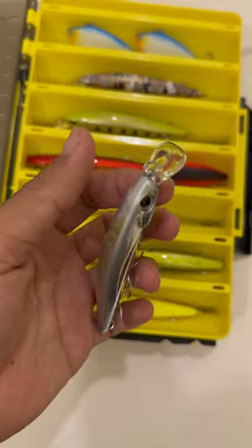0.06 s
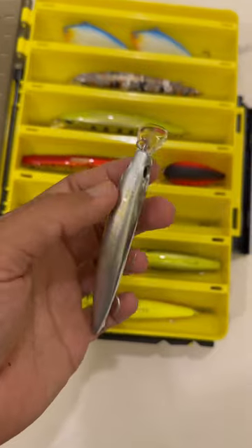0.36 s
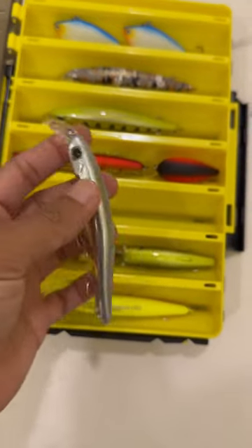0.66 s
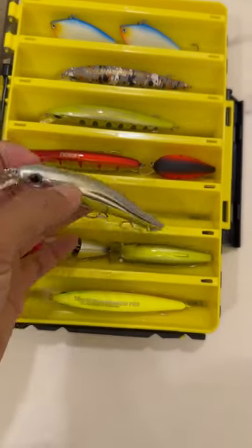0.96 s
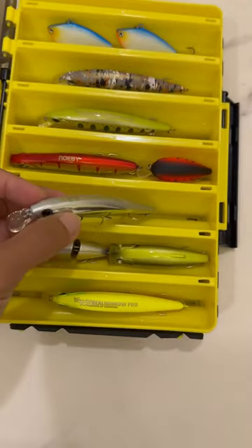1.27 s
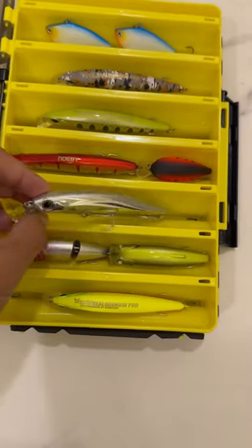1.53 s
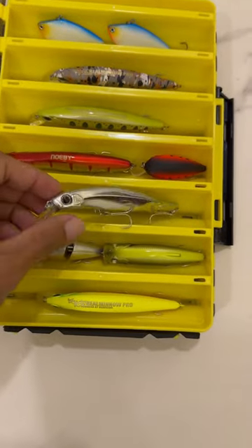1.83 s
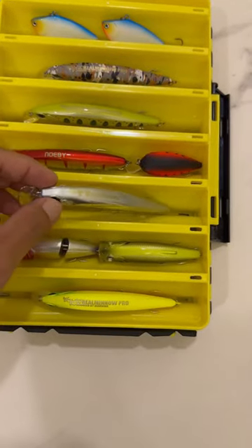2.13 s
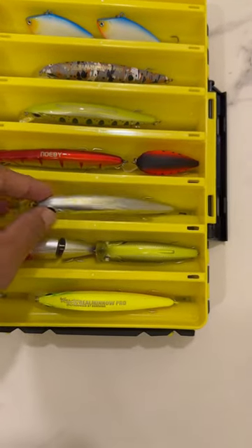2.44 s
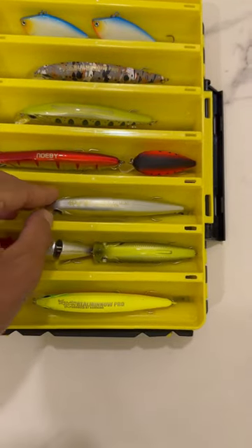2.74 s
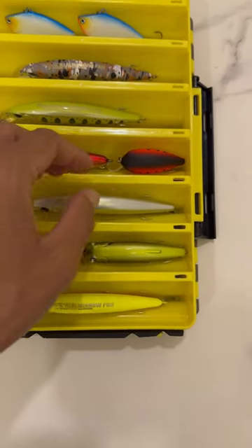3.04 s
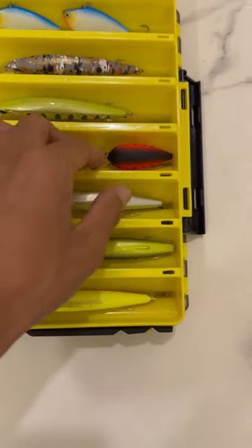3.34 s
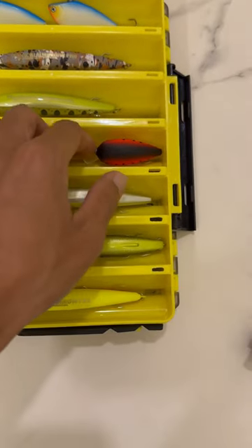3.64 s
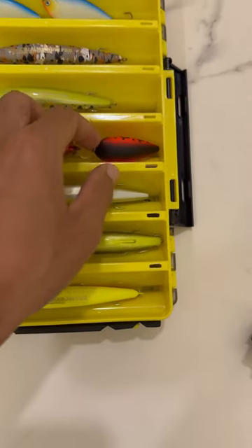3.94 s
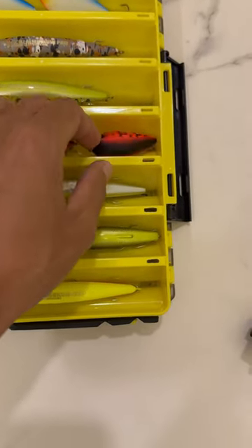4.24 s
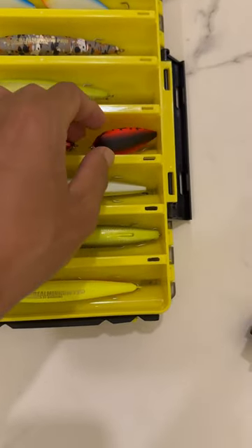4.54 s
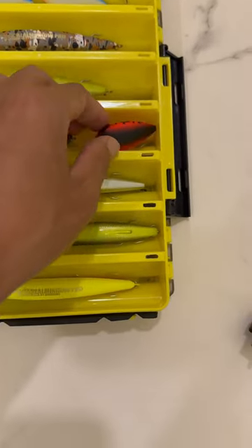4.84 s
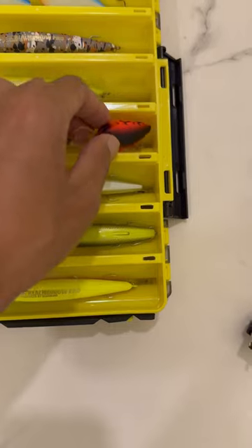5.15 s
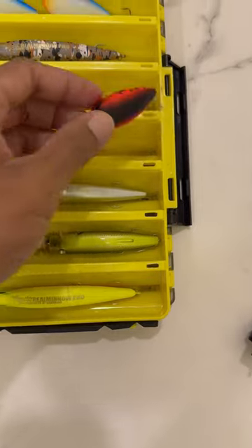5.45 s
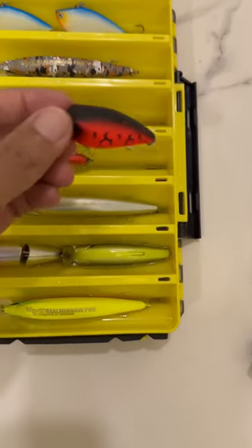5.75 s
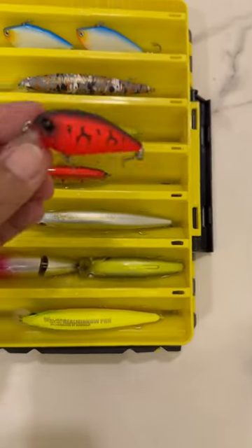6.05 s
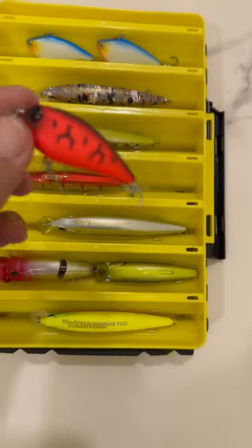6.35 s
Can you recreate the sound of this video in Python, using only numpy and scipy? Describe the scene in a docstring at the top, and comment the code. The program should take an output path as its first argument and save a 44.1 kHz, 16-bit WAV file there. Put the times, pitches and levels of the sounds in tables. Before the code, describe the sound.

For the first second there is only a faint low room hum and barely audible hook ticks. From about 1.1 seconds a hard plastic lure goes into a thin plastic tackle box tray: light, hollow knocks and clicks, short scrapes and small metal hook clinks. They come in uneven clusters around 1.2, 1.4, 1.8 and 2.1 seconds, with another sharp knock at 2.8. After a short lull, softer taps and rubbing start at 3.3 as a second lure is worked loose. It clatters at 3.9, taps and scrapes around 4.4, and gives the loudest clatter at 4.9 with a dull, low bump of the box. Hooks click lightly until about 5.4 seconds, then only faint ticks and jingles continue to the end at 6.6. Everything is close, in a small, hard room with a short echo.

```python
"""Lures in a tackle box

A plastic minnow lure drops into its slot in an open box; a crankbait is picked out of another.
Bodies knock, scrape and rub on thin tray walls; steel hooks and split rings tick and jingle.
Shoves make the box boom. It stands on a stone counter in a small, hard room with a low hum,
a phone held just above it."""
import sys
import numpy as np
from scipy import signal
from scipy.fft import rfft, irfft, next_fast_len
from scipy.io import wavfile

SR = 44100
rng = np.random.default_rng(int(sys.argv[2]) if len(sys.argv) > 2 else 0)


def generate_wav(sig):
    """Save sig (samples, or channels by samples) to the path in sys.argv[1] as 16-bit PCM at SR."""
    pcm = np.round(np.clip(np.atleast_2d(sig).T, -1, 1) * 32767).astype(np.int16)
    wavfile.write(sys.argv[1], SR, pcm)


N = 290619

# room hum spectrum (frequency [Hz], relative density [dB])
HUM_SPECTRUM = [(20, -25), (35, -14.5), (52, -4), (72, -9.5), (100, -2), (150, -6.5), (200, 1.5),
                (300, -10.5), (600, -18.5), (1000, -30), (2500, -43.5), (7000, -53)]
# room hum envelope (time [s], level [dB])
HUM_ENVELOPE = [(0, -67.5), (.45, -65), (.8, -67), (1, -67.5), (1.15, -60), (1.5, -62), (2, -70),
                (2.85, -75), (3.02, -64.5), (3.24, -74.5), (3.4, -70.5), (4.5, -65.5), (5.1, -63),
                (5.6, -66.5), (5.9, -75), (6.3, -80.5), (6.59, -74)]
# hiss spectrum (frequency [Hz], relative density [dB])
HISS_SPECTRUM = [(300, 4.5), (1000, 4.5), (2500, 2.5), (4000, 0.5), (5000, -2.5), (7000, -1.5), (9500, -5),
                 (11000, -23.5), (16000, -26.5)]
# hooks trembling on their rings (start [s], end [s], pitch [Hz], relative level [dB])
JINGLES = [(0.316, .524, 6500, -82), (1.399, 1.563, 10300, -56), (5.548, 5.858, 4500, -73.5),
           (5.876, 5.939, 14000, -62.5), (5.95, 6.176, 14100, -83.5), (6.362, 6.597, 8570, -75)]
# plastic on finger or wall (start [s], end [s], resonance [Hz], width [Hz], level [dB])
RUBS = [(0.344, 0.447, 8560, 1200, -72), (0.39, 0.538, 2800, 1300, -82), (0.48, 0.508, 9000, 2500, -64.5),
        (1.673, 1.794, 2350, 250, -69), (2.008, 2.045, 6600, 1210, -68), (5.634, 5.679, 2600, 1404, -67),
        (5.817, 5.869, 2293, 1402, -67.5), (5.875, 6.167, 8700, 1500, -76.5),
        (6.38, 6.586, 8570, 2000, -81.5)]
# hook and ring contacts (time [s], pitch [Hz], level [dB])
TICKS = [(.3605, 6400, -68.5), (.4525, 2930, -69.5), (0.4976, 14000, -57.5), (1.2132, 7950, -41.5),
         (1.2467, 6530, -39), (1.37, 7000, -56), (1.433, 14000, -42.5), (1.485, 14000, -50),
         (1.509, 13000, -53), (1.7785, 14000, -44), (2.16, 13800, -43.5), (2.3517, 3150, -43.5),
         (2.628, 4400, -54.5), (3.4115, 4850, -49.5), (3.466, 1490, -48.5), (3.8262, 4500, -45.5),
         (3.8517, 7800, -43), (3.8924, 14000, -43), (3.9277, 14000, -43), (4.158, 7000, -55),
         (4.3029, 10200, -49.5), (4.315, 13300, -53), (4.4325, 4170, -37), (4.44, 4950, -38),
         (4.578, 3450, -46), (4.7146, 6070, -50.5), (4.8095, 6760, -43), (4.9014, 7000, -39.5),
         (5.1031, 4540, -46), (5.1632, 1500, -53), (5.2, 4000, -51.5), (5.2515, 3000, -50.5),
         (5.315, 4000, -40.5), (5.3366, 5030, -42), (5.4012, 6100, -36), (5.57, 9500, -63.5),
         (5.6435, 7000, -49), (5.7128, 5000, -62), (5.8717, 4470, -57), (5.911, 12000, -59),
         (6.059, 11000, -64), (6.264, 3660, -63.5), (6.4381, 4000, -57), (6.4852, 4200, -59.5),
         (6.5334, 3460, -59.5), (6.5722, 7370, -54)]
# lure on tray (time [s], wall pitch [Hz], level [dB], softness as treble loss [dB/oct])
KNOCKS = [(1.081, 700, -34, 7), (1.2147, 716, -30.5, 13.5), (1.2192, 1340, -33, 1.5),
          (1.2471, 1660, -24, 13.5), (1.2833, 940, -41, 15), (1.3899, 660, -27, 8), (1.4211, 680, -27.5, 4),
          (1.432, 493, -42, 3), (1.5597, 1260, -45, 6), (1.5984, 654, -44.5, 7.5), (1.7712, 880, -42, 3),
          (1.7795, 1940, -21, 7.5), (1.783, 433, -20, 7), (2.0666, 805, -41, 4), (2.0723, 990, -25.5, 3.5),
          (2.0831, 606, -24.5, 8), (2.106, 1020, -26.5, 7), (2.1463, 674, -31.5, 3.5), (2.16, 2000, -24, 8),
          (2.1639, 636, -36.5, 0), (2.3289, 737, -31.5, 6), (2.394, 970, -31, 7.5), (2.531, 800, -30.5, 12),
          (2.538, 714, -41, 4.5), (2.5552, 564, -35.5, 7), (2.776, 630, -37.5, 7),
          (2.7854, 1793, -19.5, 10), (2.7974, 1850, -34, 5), (2.8, 1620, -26.5, 11.5),
          (3.2729, 1160, -45, 9.5), (3.3331, 900, -47, 7), (3.374, 836, -44, 10), (3.3898, 1000, -41.5, 11),
          (3.446, 1170, -38, 4.5), (3.5044, 1010, -36, 4), (3.6631, 1185, -46, 11), (3.717, 1080, -40.5, 9),
          (3.814, 1460, -48, 12), (3.8376, 465, -37, 4.5), (3.885, 460, -32.5, 7.5),
          (3.8936, 530, -25, 1.5), (3.897, 470, -21.5, 6), (3.903, 1440, -25, 18),
          (3.9285, 636, -30.5, 1.5), (3.932, 500, -21.5, 5.5), (4.0662, 2000, -46, 16),
          (4.142, 565, -36.5, 3), (4.168, 495, -40, 4), (4.2082, 448, -46, 6), (4.2921, 513, -45.5, 9.5),
          (4.3982, 550, -33.5, 5), (4.4173, 1140, -32.5, 4.5), (4.452, 445, -33.5, 5.5),
          (4.4889, 1210, -30.5, 6.5), (4.5015, 1480, -39.5, 2), (4.6428, 2030, -46.5, 14),
          (4.722, 550, -36.5, 5), (4.776, 650, -39, 7.5), (4.7894, 1570, -41, 7.5), (4.8714, 900, -46.5, 4),
          (4.8774, 520, -34, 5), (4.9014, 484, -21.5, 8), (4.9105, 1010, -19.5, 2.5), (4.917, 1670, -18, 7),
          (4.921, 436, -25.5, 1.5), (4.9445, 1590, -24, 15), (4.948, 462, -29.5, 2), (4.966, 447, -31, 6),
          (5.4016, 1220, -45, -1), (5.8197, 1800, -55, 6)]
# shoves on the box (time [s], level [dB])
SHOVES = [(1.084, -45), (1.222, -43), (1.393, -46.5), (1.781, -56), (2.785, -45.5), (3.898, -43.5),
          (4.168, -53.5), (4.398, -58.5), (4.912, -36.5)]
# lure along tray (start [s], end [s], wall pitch [Hz], relative level [dB], softness [dB/oct])
SLIDES = [(1.266, 1.317, 520, -49, 5.5), (1.664, 1.804, 520, -58.5, 4), (1.989, 2.074, 650, -54, 5.5),
          (2.086, 2.15, 520, -50.5, 3), (2.498, 2.55, 750, -53.5, 5), (2.541, 2.641, 520, -46.5, 6.5),
          (3.335, 3.486, 700, -50, 6), (3.663, 3.791, 850, -55.5, 4.5), (3.799, 3.894, 850, -55.5, 2),
          (3.892, 3.961, 1600, -38, 4.5), (4.137, 4.38, 520, -58, 3), (4.396, 4.523, 650, -46.5, 4),
          (4.519, 4.606, 650, -47, 6.5), (4.75, 4.907, 520, -43, 5), (4.89, 4.98, 1300, -35.5, 2.5),
          (5.057, 5.253, 1200, -58, 3.5), (5.246, 5.347, 850, -50.5, 2)]
# body, clack, snap, tick and sparkle bands (low edge [Hz], high edge [Hz])
BANDS = [(345, 760), (760, 2100), (2100, 5200), (5200, 10300), (11000, 16500)]
# tray modes (frequency [Hz], relative level [dB], t60 [s])
TRAY_MODES = [(433.7, 11.5, 0.027), (430, 6, 0.11), (520, 1, 0.062), (594, 1.5, 0.24), (883.4, -4.5, 0.027),
              (1020.4, 5.5, 0.08), (1152, 4, 0.046), (1440, 3, 0.061), (1556, -2, 0.13), (1850, 0.5, 0.019),
              (2440, -1.5, 0.094), (2860, -5.5, 0.069), (3407, -8, .035)]
# steel hook modes (frequency [Hz], relative level [dB], t60 [s])
HOOK_MODES = [(5350, -4, 0.11), (5800, -2.5, .05), (6450, -8, .04), (7460, 1, 0.035), (7250, -2.5, 0.12),
              (8340, -6, 0.065), (9900, -5.5, .04)]
# room decay (frequency [Hz], t60 [s])
ROOM_DECAY = [(100, 0.9), (400, 0.54), (1000, 0.5), (2000, 0.5), (3200, 0.32), (5000, 0.34), (7000, 0.33),
              (10000, 0.25), (16000, 0.16)]
# echo spectrum (frequency [Hz], relative level [dB])
ROOM_SPECTRUM = [(100, -14.5), (250, -19), (420, -14.5), (800, -12), (1450, -15.5), (2000, -15.5),
                 (2700, -8.5), (3700, -14.5), (4800, -11.5), (7000, -15.5), (10000, -10), (16000, -17)]
# stereo width (frequency [Hz], side gain [dB])
WIDTH = [(100, -17), (400, -15), (700, -6.5), (1300, -13), (2200, -10.5), (3000, 3.5), (4000, -12.5),
         (4900, -3.5), (5700, -17), (7000, -3.5), (9000, -3), (16000, 2)]
# treble colour, with a hollow near 12 kHz (frequency [Hz], mid gain [dB], side gain [dB])
TREBLE_COLOUR = [(3704, -2.5, -4), (4720, -10.5, -2), (5700, 1.5, -8), (7000, 1.5, -2), (8170, -5, -9),
                 (9470, -2.5, -2.5), (10600, -12, -4.5), (12300, -20, -0.5), (14500, -11.5, -8),
                 (15500, -7.5, 5.5)]

FILTER_CACHE = {}


def undb(db):
    return 10 ** (np.asarray(db) / 20)


def unit_rms(x):
    return x / np.sqrt(np.mean(x ** 2) + 1e-20)


def decay(t, t60_s):
    return np.exp(-np.log(1000) * t / max(t60_s, 1e-4))


def lookup(points, hz, column=1):
    """Interpolate a table over log frequency."""
    table = np.array(points, float)
    return np.interp(np.log(np.maximum(hz, 1)), np.log(table[:, 0]), table[:, column])


def colour(x, points, column=1):
    """Filter by a table of gains in dB."""
    size = next_fast_len(2 * len(x))
    gain = undb(lookup(points, np.fft.rfftfreq(size, 1 / SR), column))
    return irfft(rfft(x, size) * gain, size)[:len(x)]


def band(x, edges_hz, order=3):
    key = (*edges_hz, order)
    if key not in FILTER_CACHE:
        FILTER_CACHE[key] = signal.butter(order, edges_hz, "bandpass", fs=SR, output="sos")
    return signal.sosfilt(FILTER_CACHE[key], x)


def add(track, time_s, sound):
    start = int(time_s * SR)
    part = sound[:, :N - start]
    track[:, start:start + part.shape[1]] += part


def hum(waver_db=0.6):
    """Low, slowly wavering room noise."""
    t = np.arange(N) / SR
    steps_s = np.linspace(0, t[-1], 50)
    waver = np.interp(t, steps_s, rng.standard_normal(len(steps_s)))
    gain = undb(np.interp(t, *np.transpose(HUM_ENVELOPE)) + waver_db * waver)
    mid, side = (unit_rms(colour(rng.standard_normal(N), HUM_SPECTRUM)) for _ in range(2))
    return gain * np.array([mid, colour(side, [(100, -15.5), (500, 2.5), (2500, 1.5)])])


def hiss(level_db=-86):
    """Faint, steady noise, uncorrelated left and right."""
    noise = rng.standard_normal((2, N))
    return undb(level_db) * np.array([unit_rms(colour(x, HISS_SPECTRUM)) for x in noise])


def contact_levels(hz, db, bass_db_oct, treble_db_oct):
    """Band levels in dB, falling away on both sides of the contact's pitch."""
    octaves = np.log2(np.sqrt(np.prod(BANDS, axis=1)) / hz)
    return db + bass_db_oct * np.minimum(octaves, 0) - treble_db_oct * np.maximum(octaves, 0)


def steel(hz, db):
    """Band levels of steel: hardness is constant, so part size alone sets the colour."""
    return contact_levels(hz, db, bass_db_oct=6, treble_db_oct=8)


def ring(modes, t, detune, spread_db=4):
    """Damped modes; mix and tuning vary with each contact point and hook."""
    draws = rng.uniform(-0.94, 1, (len(modes), 3))
    out = np.zeros(len(t))
    for (hz, db, t60_s), (mix, tuning, phase) in zip(modes, draws):
        tone = np.sin(2 * np.pi * (hz * (1 + detune * tuning) * t + phase))
        out += undb(db + spread_db * mix) * tone * decay(t, t60_s)
    return out


def blow(bands, levels_db, t60s_s, rise_s, tone_hz=1000, tone_db=-99, t60_cycles=6, ring_db=-35):
    """One contact, mid/side: a crack of dense modes, the struck part's tone, tray and hook ringing."""
    t = np.arange(SR // 8) / SR
    onset = SR // 125  # first 8 ms set the level
    push = 1 - np.exp(-t / rise_s)  # plastic yields before it springs back
    out = np.zeros((2, len(t)))
    for channel in out:
        phase = rng.uniform(0, 2 * np.pi)
        tone = undb(tone_db) * np.sin(2 * np.pi * tone_hz * t + phase) * decay(t, t60_cycles / tone_hz)
        ringing = ring(TRAY_MODES, t, detune=.012) + ring(HOOK_MODES, t, detune=.04)
        for (low_hz, high_hz), db, t60_s in zip(bands, levels_db, t60s_s):
            wide_hz = (low_hz * .6, min(high_hz * 1.7, SR * .45))
            crack = unit_rms(band(rng.standard_normal(len(t)), wide_hz, order=1)) * decay(t, t60_s)
            part = band(push * (crack + tone + undb(ring_db) * ringing), (low_hz, high_hz))
            channel += undb(db) * part / np.sqrt(np.mean(part[:onset] ** 2))
    return out


def pressure(size, waver_db):
    """A hand stroke sets in, wavers and lets go."""
    steps = np.arange(0, N, SR // 70)
    swell = signal.windows.tukey(size, .5) ** .7
    waver = np.interp(np.arange(size), steps, rng.standard_normal(len(steps)))
    return swell * undb(waver_db * waver)


def drag(length_s, levels_db, catches_per_s, spread_db, points=4):
    """Tiny, uneven catches at a few contact points, each ringing tray and hooks."""
    size = max(int(length_s * SR), SR // 100)
    trigger, direction, grip = rng.random((size, 3)).T
    strength = undb(spread_db * np.minimum(-np.log(grip), 3))
    catches = (trigger < catches_per_s / SR) * np.sign(direction - .5) * strength
    catches *= pressure(size, waver_db=5.5)
    point = rng.integers(points, size=size)
    sound = 0
    for k in range(points):
        response = blow(BANDS, levels_db, t60s_s=(.015, .0057, .039, .008, .008), rise_s=.0006)
        sound += signal.fftconvolve((catches * (point == k))[None], response, axes=1)
    return sound * np.linalg.norm(undb(levels_db)) / np.sqrt(np.mean(sound[0, :size] ** 2) + 1e-20)


def jingles(gain_db=-1):
    """Loose hooks tremble in runs of tiny ticks."""
    out = np.zeros((2, N))
    for start_s, end_s, hz, db in JINGLES:
        add(out, start_s, drag(end_s - start_s, steel(hz, db + gain_db), catches_per_s=400, spread_db=3))
    return out


def rubs():
    """Fine friction keeps one lure resonance whispering."""
    out = np.zeros((2, N))
    for start_s, end_s, hz, width_hz, db in RUBS:
        size = max(int((end_s - start_s) * SR), SR // 100)
        friction = band(rng.standard_normal((2, size)), (hz - width_hz / 2, hz + width_hz / 2), order=2)
        add(out, start_s, undb(db) * unit_rms(friction * pressure(size, waver_db=3.5)))
    return out


def bounce(sound, rebound_db):
    """A light part touches twice more within milliseconds."""
    out = sound.copy()
    lags_s = np.cumsum(rng.uniform(.0012, .0045, size=2))
    for count, lag_s in enumerate(lags_s, 1):
        lag = int(lag_s * SR)
        out[:, lag:] += undb(rebound_db * count) * sound[:, :-lag]
    return out


def ticks(max_t60_s=0.033, knee_hz=3000):
    """Hooks and rings graze lure or wall; above the knee, smaller hooks die out sooner."""
    out = np.zeros((2, N))
    for time_s, hz, db in TICKS:
        clink_t60_s = max_t60_s * min(knee_hz / hz, 1) ** 2
        tick = blow(BANDS[1:], steel(hz, db)[1:], t60s_s=(.0056, .018, .0093, .012), rise_s=.0018,
                    tone_hz=hz, tone_db=-5, t60_cycles=clink_t60_s * hz)
        add(out, time_s, bounce(tick, rebound_db=-13.5))
    return out


def plastic(hz, db, softness_db_oct, sparkle_loss_db=6, sparkle_cap_db=-48):
    """Band levels of plastic: soft contacts lose treble; under hard blows the sparkle stops rising, as jarred
    hooks can only ring so loud."""
    levels_db = contact_levels(hz, db, bass_db_oct=4.5, treble_db_oct=softness_db_oct)
    levels_db[-1] = min(levels_db[-1] - sparkle_loss_db, sparkle_cap_db)
    return levels_db


def knocks():
    """Hollow lures hit the tray; low wall modes outlast high ones."""
    out = np.zeros((2, N))
    for time_s, wall_hz, db, softness_db_oct in KNOCKS:
        levels_db = plastic(wall_hz, db, softness_db_oct)
        knock = blow(BANDS, levels_db, t60s_s=(.018, .0086, .014, .0098, .008), rise_s=.001,
                     tone_hz=wall_hz, tone_db=2)
        add(out, time_s, bounce(knock, rebound_db=-11))
    return out


def booms(hz=97, t60_s=0.37, rise_s=0.012, thud_db=-2):
    """Shoves rock the whole box: one low mode plus a thud, mid only."""
    out = np.zeros((2, N))
    t = np.arange(SR // 2) / SR
    mode = np.sin(2 * np.pi * hz * t) * decay(t, t60_s)
    for time_s, db in SHOVES:
        thud = unit_rms(band(rng.standard_normal(len(t)), (60, 260))) * decay(t, t60_s=0.19)
        swing = (mode + undb(thud_db) * thud) * (1 - np.exp(-t / rise_s))
        add(out[:1], time_s, undb(db) * swing[None])
    return out


def slides(gain_db=-1):
    """Lure bodies scrape along the walls in dense catches."""
    out = np.zeros((2, N))
    for start_s, end_s, wall_hz, db, softness_db_oct in SLIDES:
        levels_db = plastic(wall_hz, db + gain_db, softness_db_oct)
        add(out, start_s, drag(end_s - start_s, levels_db, catches_per_s=1800, spread_db=2))
    return out


def room(x, length_s=.7, rise_s=.0023, gain_db=-3):
    """Diffuse echoes off hard walls, mid/side; treble dies first, bass stays near the centre."""
    t = np.arange(int(length_s * SR)) / SR
    build_up = 1 - np.exp(-(t / rise_s) ** 2)
    edges_hz = np.geomspace(60, 17000, 29)
    response = np.zeros((2, len(t)))
    for low_hz, high_hz in zip(edges_hz, edges_hz[1:]):
        hz = np.sqrt(low_hz * high_hz)
        tail = band(rng.standard_normal((2, len(t))), (low_hz, high_hz))
        tail *= decay(t, lookup(ROOM_DECAY, hz)) * build_up
        energy = np.sum(tail ** 2, axis=1, keepdims=True)
        tail *= np.sqrt(2 * (high_hz - low_hz) / SR / energy)  # unity gain in band
        tail[1] *= undb(3.5 + 0.66 * lookup(WIDTH, hz))
        response += undb(lookup(ROOM_SPECTRUM, hz)) * tail
    return undb(gain_db) * signal.fftconvolve(x[None], response, axes=1)[:, :N]


def scene():
    """Mix box, room and noise in mid/side; return left/right."""
    contacts = knocks() + ticks() + slides() + jingles()
    clatter = band(contacts, (320, 20000), order=6)  # small walls radiate no bass
    mid, side = clatter + rubs() + booms()
    echoes = room(mid) + room(side)  # each radiated direction takes its own path
    mid, side = np.array([mid, colour(side, WIDTH)]) + echoes
    coloured = np.array([colour(mid, TREBLE_COLOUR, column=1), colour(side, TREBLE_COLOUR, column=2)])
    mid, side = coloured + hum() + hiss()
    return np.array([mid + side, mid - side])


def record(dry):
    """The phone cuts the top treble."""
    cutoff_hz = 15900
    return signal.sosfilt(signal.ellip(8, .2, 70, cutoff_hz, fs=SR, output="sos"), dry)


dry = scene()
out = record(dry)
generate_wav(out)
```